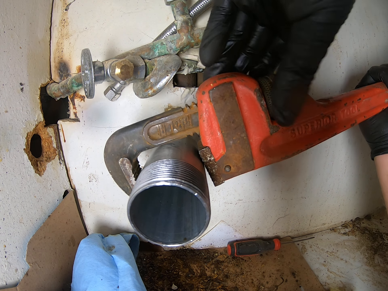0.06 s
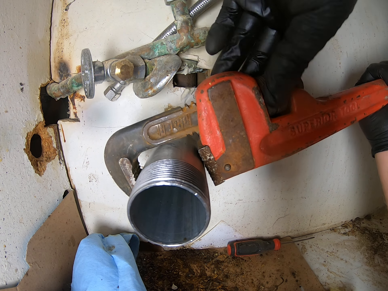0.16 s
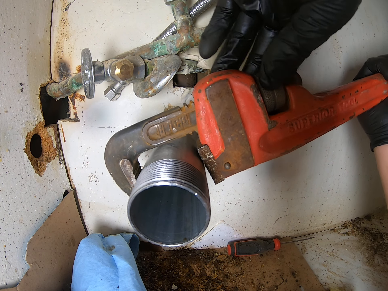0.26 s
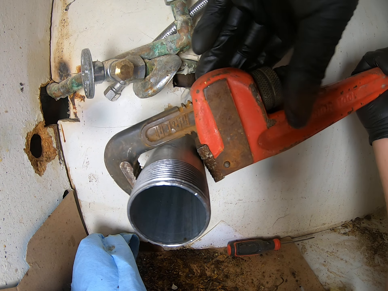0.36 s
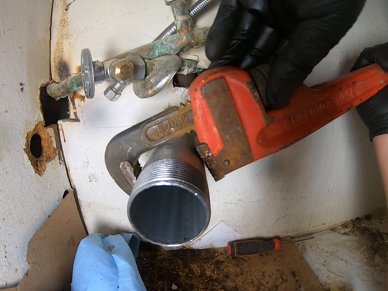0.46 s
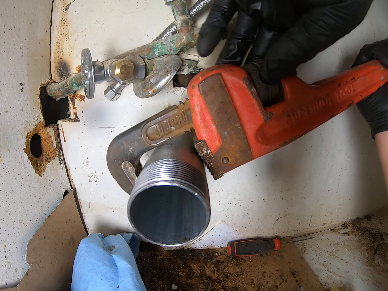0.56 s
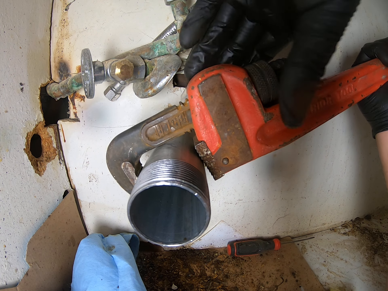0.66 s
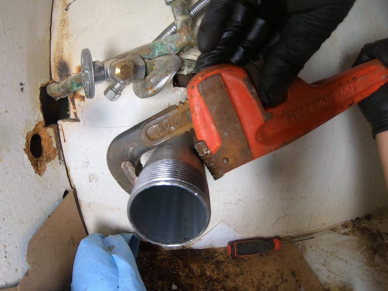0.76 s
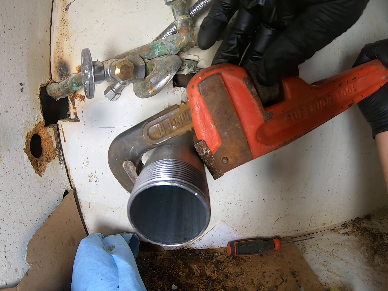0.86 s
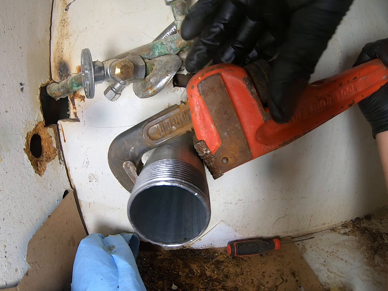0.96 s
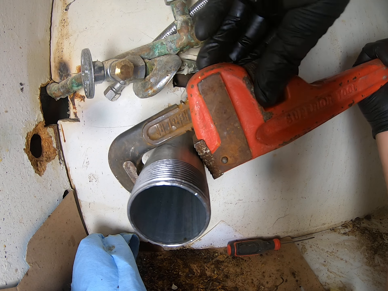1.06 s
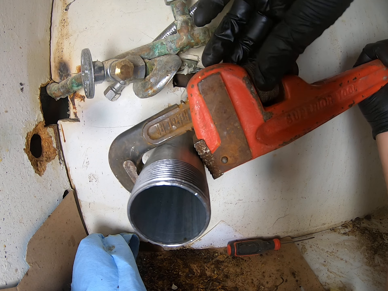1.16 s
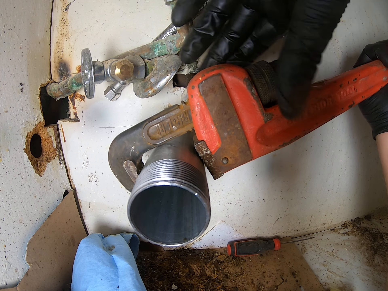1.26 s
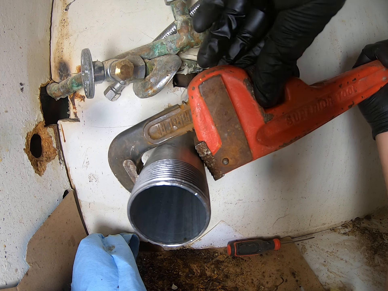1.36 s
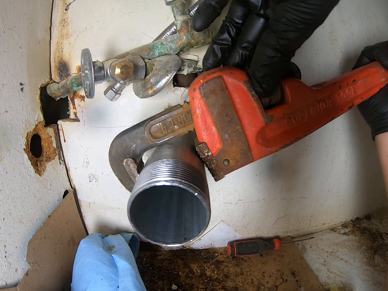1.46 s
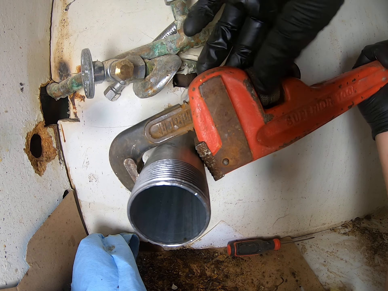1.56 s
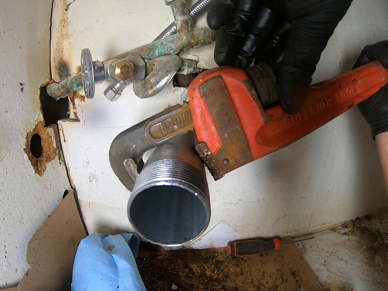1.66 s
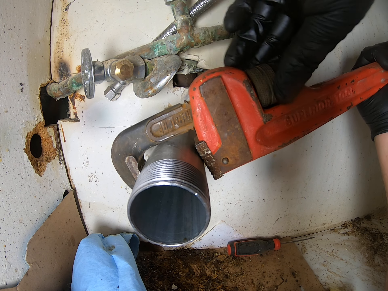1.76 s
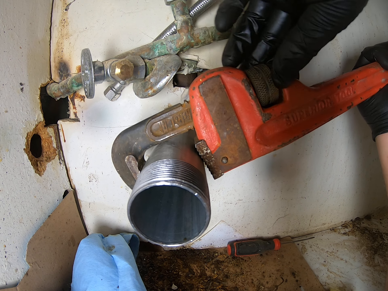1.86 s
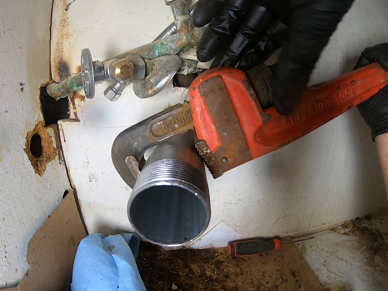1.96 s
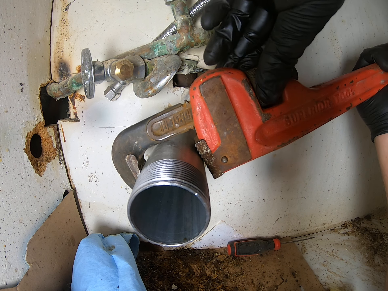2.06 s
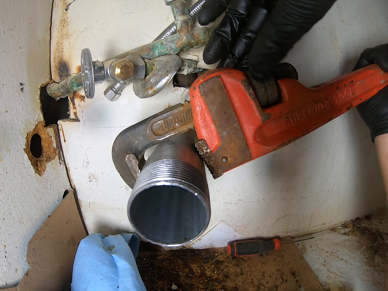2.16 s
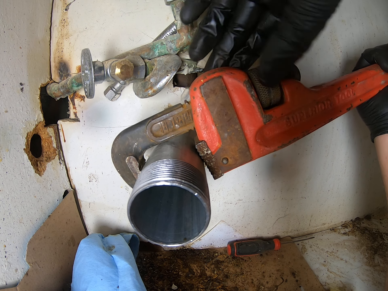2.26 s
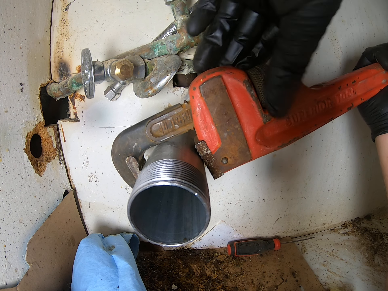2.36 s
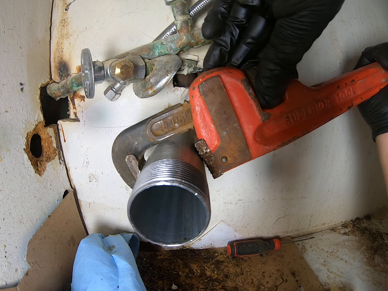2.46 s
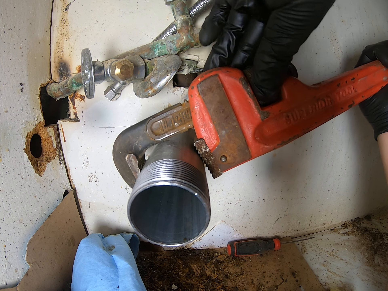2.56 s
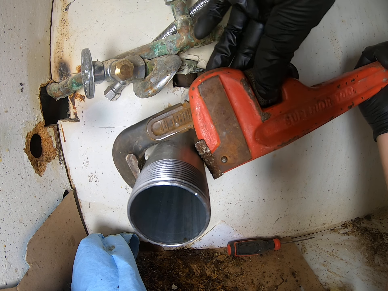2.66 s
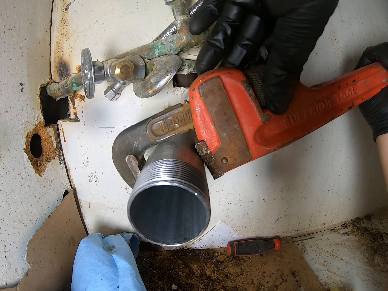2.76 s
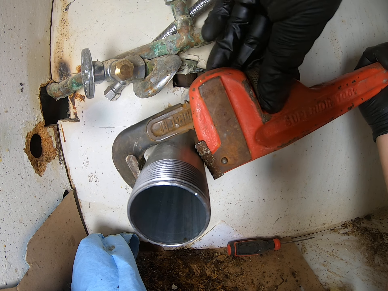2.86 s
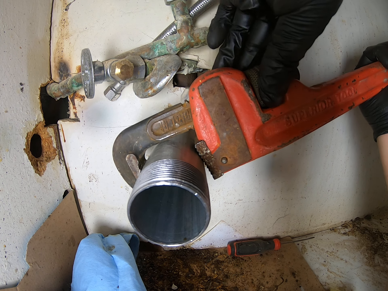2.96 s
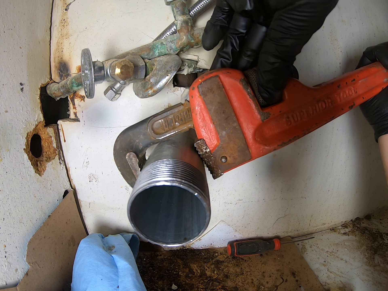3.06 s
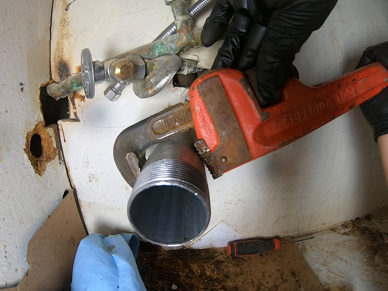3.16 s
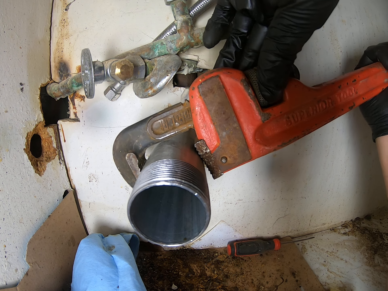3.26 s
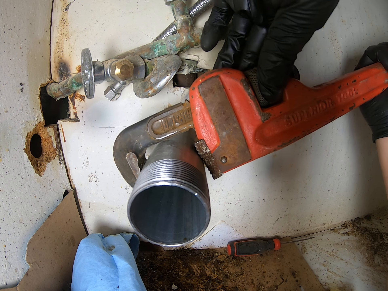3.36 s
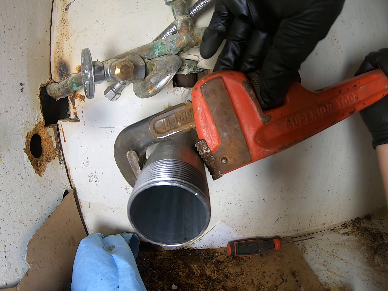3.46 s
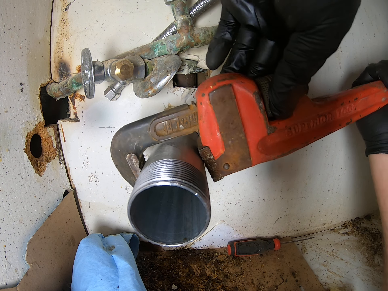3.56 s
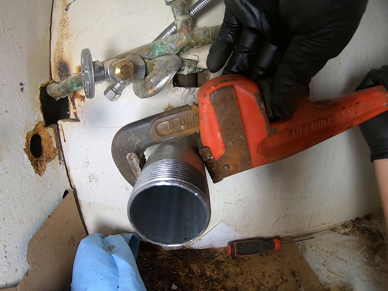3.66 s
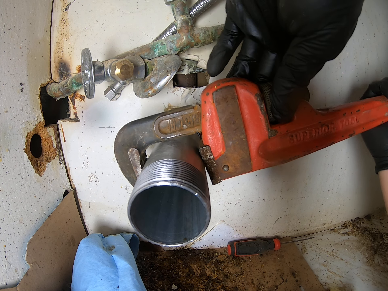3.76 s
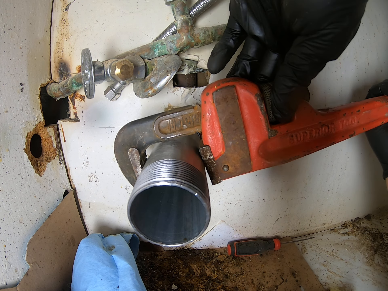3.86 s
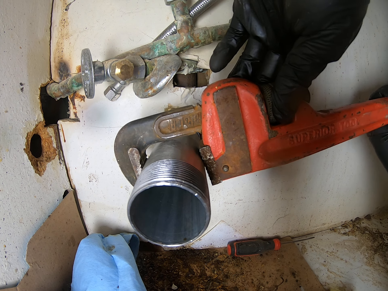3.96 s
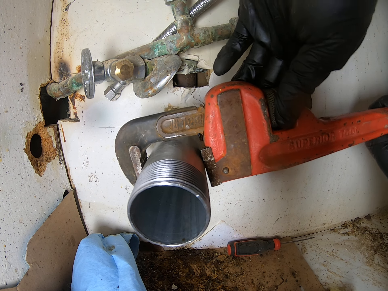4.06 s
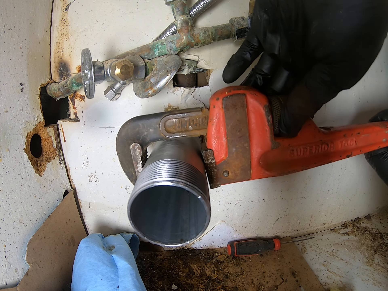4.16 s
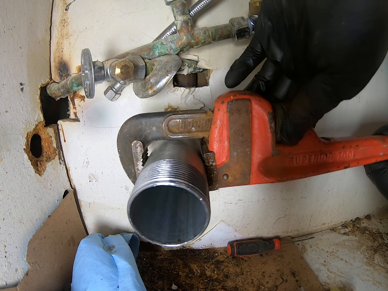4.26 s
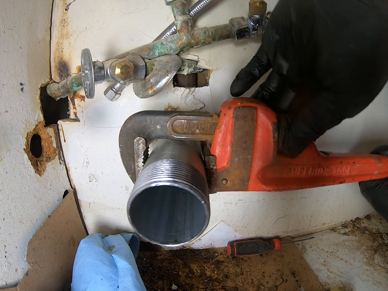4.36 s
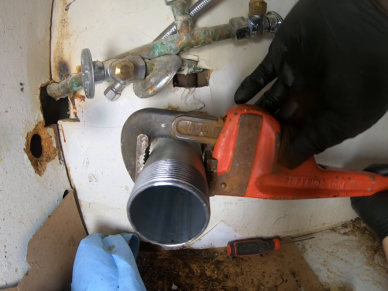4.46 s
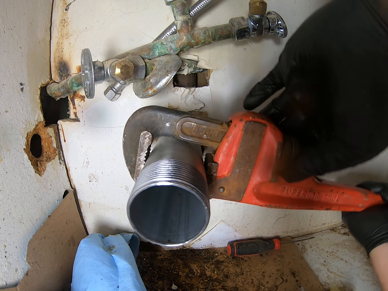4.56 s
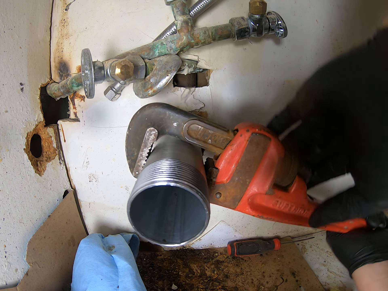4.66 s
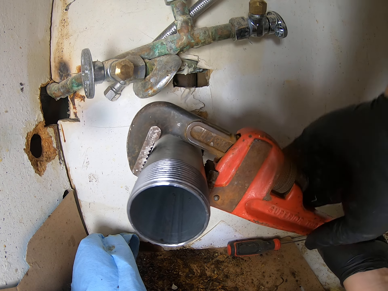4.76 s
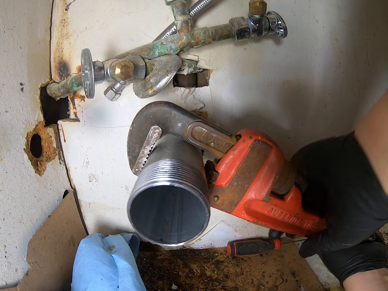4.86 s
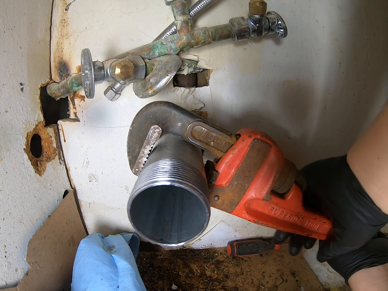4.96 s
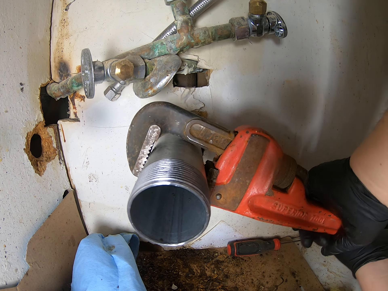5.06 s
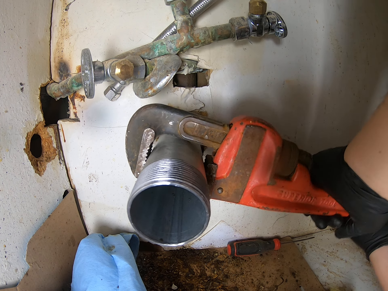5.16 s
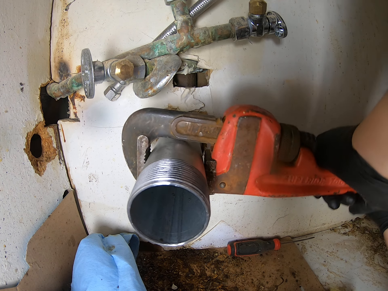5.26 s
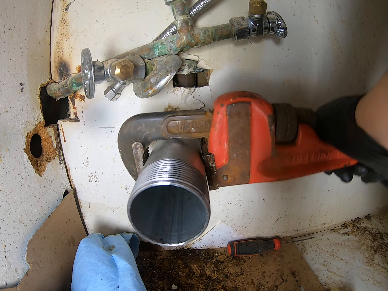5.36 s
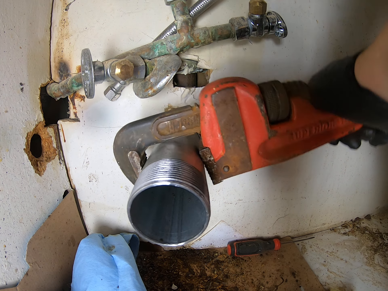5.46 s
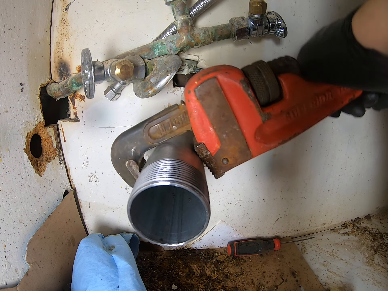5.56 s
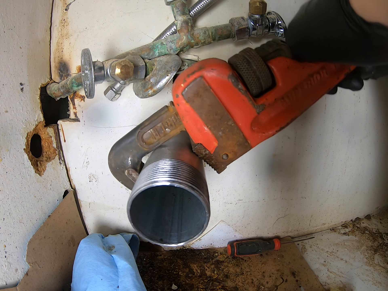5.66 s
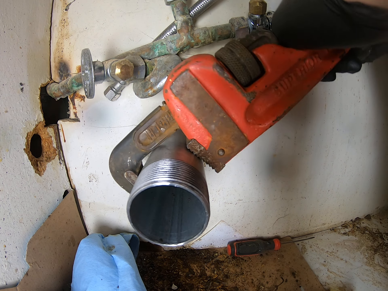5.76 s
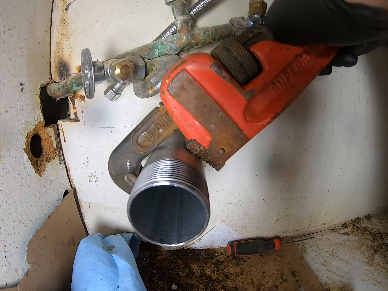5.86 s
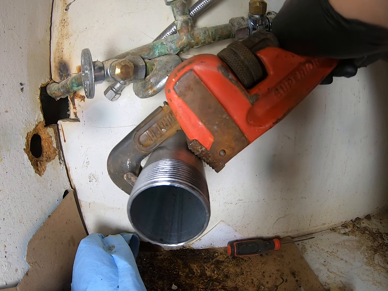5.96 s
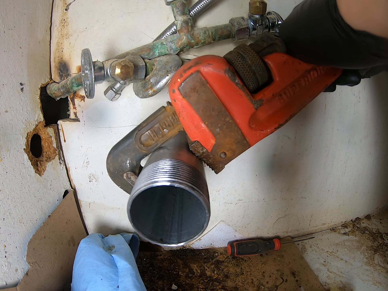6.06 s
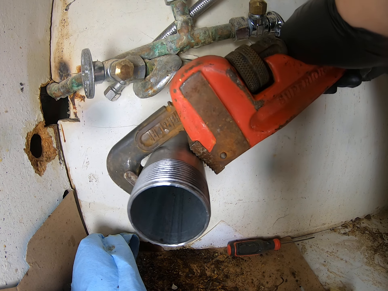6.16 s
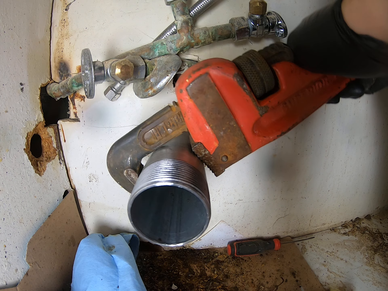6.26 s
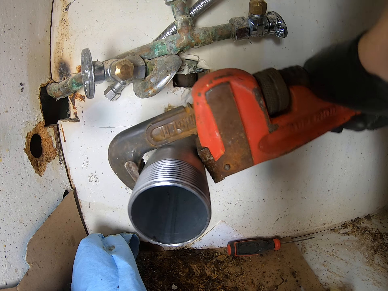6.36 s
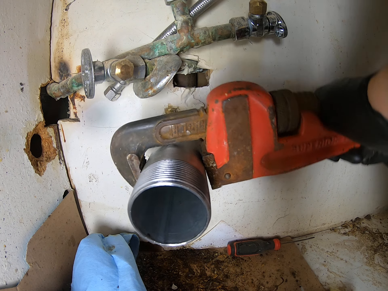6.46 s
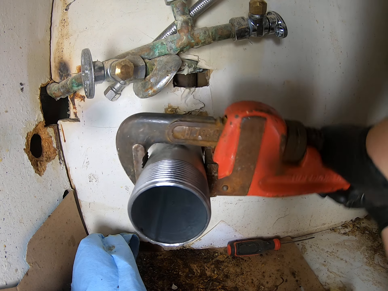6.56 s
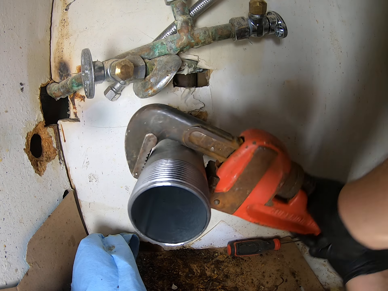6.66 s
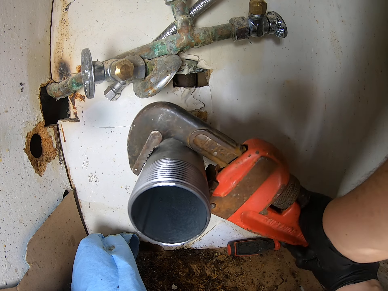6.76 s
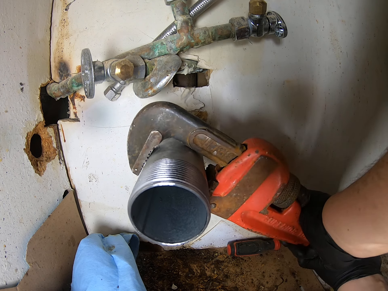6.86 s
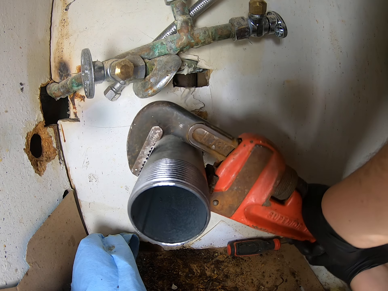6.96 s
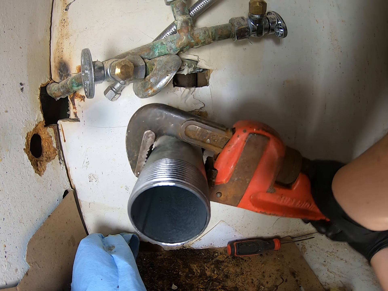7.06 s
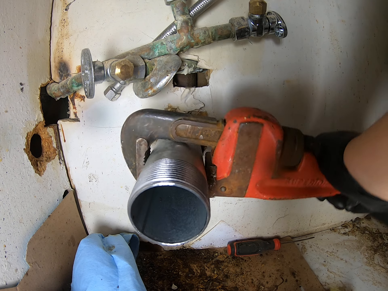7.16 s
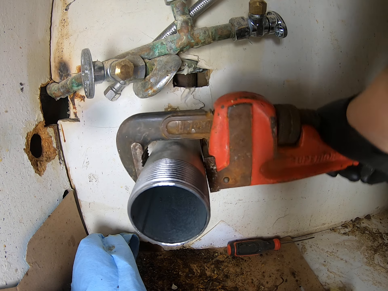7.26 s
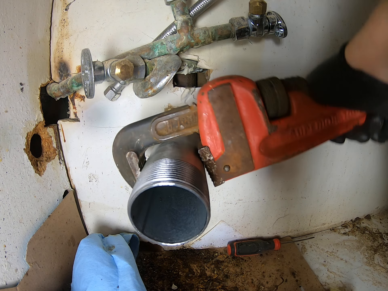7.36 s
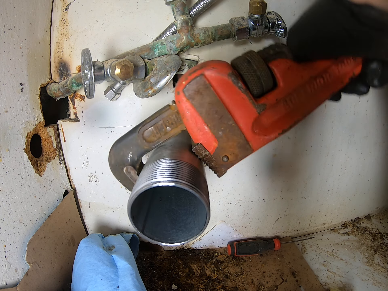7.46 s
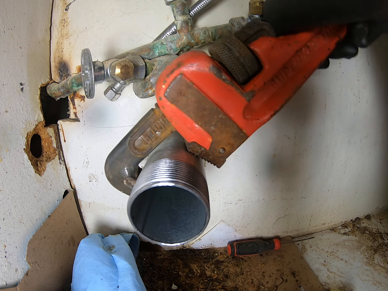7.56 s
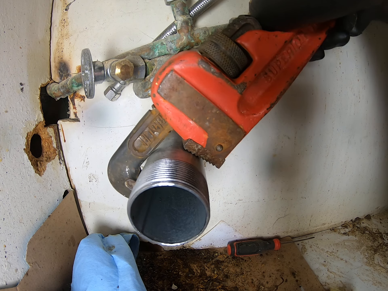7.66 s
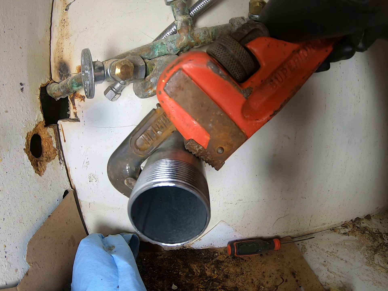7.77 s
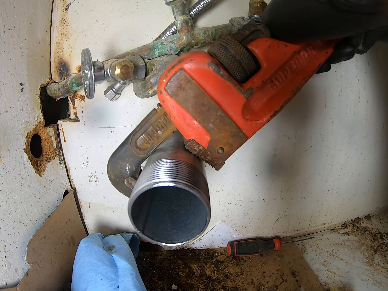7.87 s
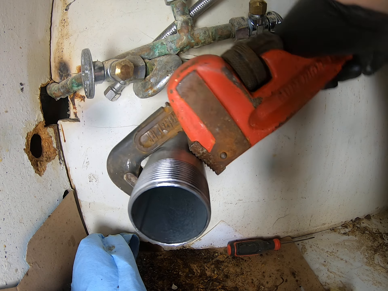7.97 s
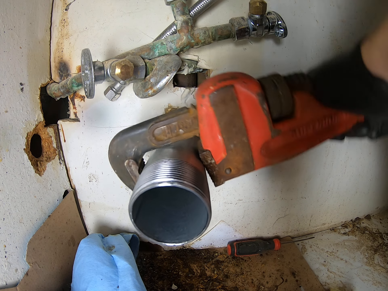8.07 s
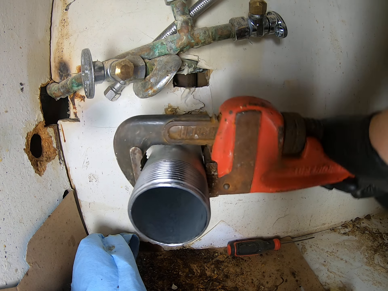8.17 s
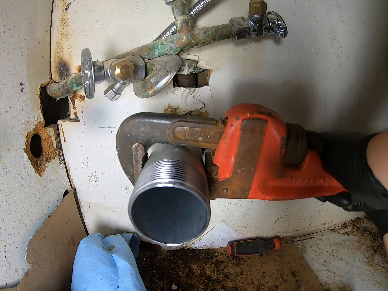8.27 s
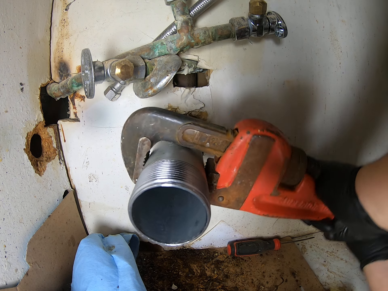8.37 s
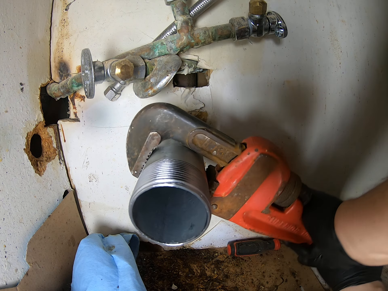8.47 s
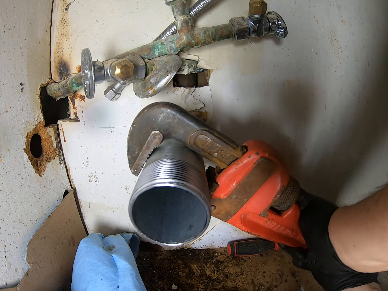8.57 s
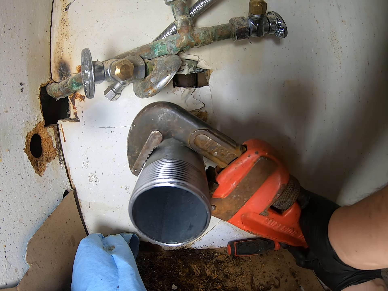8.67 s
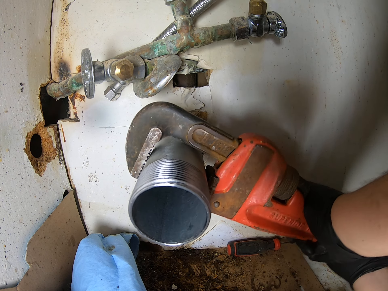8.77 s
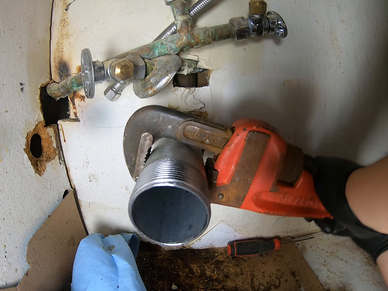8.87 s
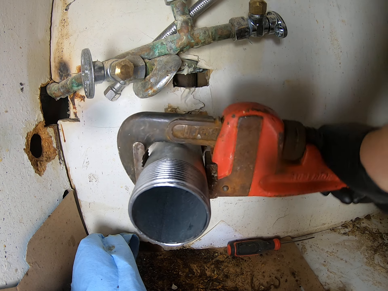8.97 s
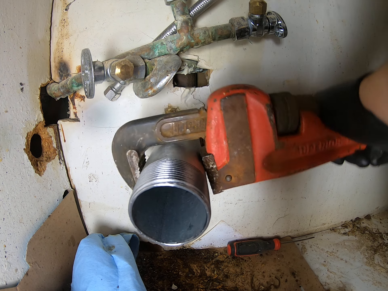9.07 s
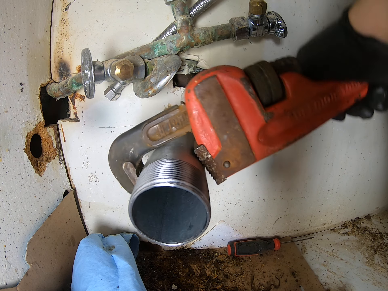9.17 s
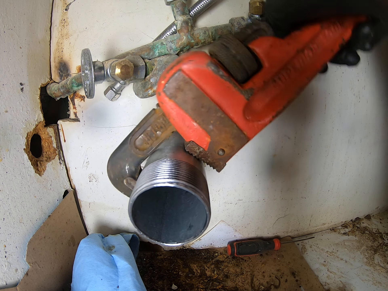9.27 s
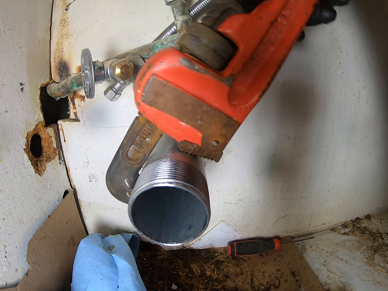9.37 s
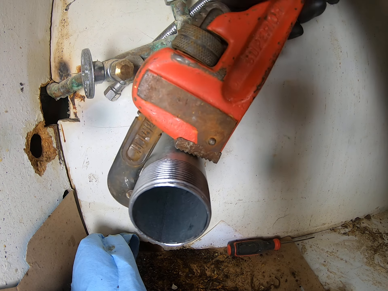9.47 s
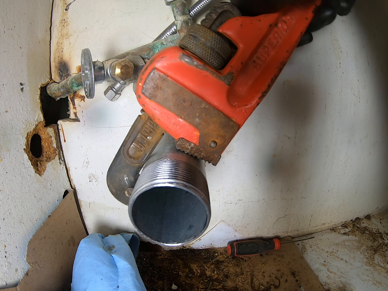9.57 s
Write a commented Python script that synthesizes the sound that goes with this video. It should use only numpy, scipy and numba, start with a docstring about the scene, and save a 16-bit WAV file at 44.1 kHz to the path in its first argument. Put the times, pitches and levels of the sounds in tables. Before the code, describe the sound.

Close microphone in a boxy under-sink cabinet, short tail, faint wavering mains hum throughout. From 0.2 to 1.1 s, quick uneven steel clicks of a wrench jaw and nut, with brief metallic chatter and soft glove rubbing. A sharp snap at 1.5, bright ticks at 1.8-1.9, a strong click at 2.2 and a clack near 3.0. From 3.1 to 5 s it is sparse: small dull taps, soft scuffs, low cabinet murmur. At 5.1 a loud, hard clank with a short ring and jaw rattle. Then grinding strokes and glove hiss, deep thumps at 5.9, a clank at 6.35, knocks and a slam around 7.0, pipe clicks at 7.45 and booms at 7.7. At 8.6-8.8 comes the densest cluster of heavy metal slams and thuds; scattered knocks follow, scraping swells, and pipe clicks end in a final slam at 9.6.

```python
"""Inside a sink cabinet a pipe wrench is set on a steel fitting, its nut thumbed shut, then it is swung round.
Steel clicks are short noisy contacts that crack broadly and excite decaying modes of jaw, nut and pipe.
Sliding teeth and gloves scrape as grainy filtered noise, and a loose jaw chatters and keeps the steel singing.
The cabinet panels boom and hum as shaken and struck resonances, over a mains hum."""
import sys
import numpy as np
from scipy import signal
from scipy.fft import rfft, irfft, next_fast_len
from scipy.io import wavfile
from scipy.ndimage import uniform_filter1d
from numba import njit

SR = 44100
rng = np.random.default_rng(int(sys.argv[2]) if len(sys.argv) > 2 else 0)


def pcm_store(signal):
    """Save signal as 16-bit PCM."""
    levels = np.round(np.clip(np.atleast_2d(signal), -1, 1) * 32767)
    wavfile.write(sys.argv[1], SR, levels.astype(np.int16).T)


N = 424683  # length in samples

# blows of steel on steel: start_s, level_db, spot (name), hardness_db_per_octave (about the jaw's pitch)
BLOWS = [(0.1949, -25.5, "nut", 3), (0.213, -19, "nut", 2), (0.287, -28.5, "jaw", -9),
         (0.3508, -28.5, "jaw", -8), (0.503, -21, "snap", -1.5), (0.559, -28, "jaw", 1),
         (0.5735, -19, "jaw", 8.5), (0.623, -24.5, "nut", -2), (0.6503, -18, "jaw", -1.5),
         (0.678, -33.5, "jaw", 2), (0.73, -45, "tick", 11), (0.849, -37, "tick", 3),
         (0.858, -23.5, "nut", -1), (0.869, -29.5, "jaw", -3), (0.92, -36, "jaw", 11),
         (0.932, -20.5, "nut", -1.5), (0.947, -22.5, "jaw", -5.5), (1.044, -48, "thud", 13),
         (1.016, -49, "tick", 9), (1.114, -42.5, "tick", 5), (1.173, -52.5, "thud", -7),
         (1.284, -48, "thud", -3.5), (1.421, -39, "nut", 5.5), (1.4587, -13.5, "snap", -2),
         (1.489, -28.5, "jaw", 5), (1.518, -25.5, "nut", 0), (1.548, -25, "pipe", -2.5),
         (1.802, -20, "tick", 6), (1.8101, -21, "tick", 0.5), (1.8785, -16.5, "jaw", -7.5),
         (1.889, -13.5, "tick", 3), (2.0066, -25.5, "tick", 0.5), (2.114, -29, "nut", -3.5),
         (2.1625, -13, "jaw", 1), (2.295, -29, "tick", -3), (2.303, -32.5, "tick", 6.5),
         (2.32, -23.5, "nut", -1.5), (2.355, -33.5, "tick", 5.5), (2.448, -48, "nut", -1),
         (2.5011, -32.5, "tick", -2.5), (2.555, -23, "jaw", 1.5), (2.762, -39, "knock", 1.5),
         (2.9602, -17.5, "clack", -4.5), (3.061, -35, "slam", 5.5), (3.563, -35, "tap", 2),
         (3.812, -32.5, "knock", -6), (3.618, -43.5, "tap", 3), (3.707, -42.5, "tap", 0),
         (3.76, -42.5, "tap", 2), (3.962, -43, "tap", -3), (3.993, -46, "tap", 0), (4.408, -41, "tap", 5),
         (4.515, -44.5, "tap", 4), (4.641, -42.5, "tap", -2), (5.11, -4.5, "clank", -1),
         (5.138, -30.5, "thud", 4.5), (5.1962, -20, "clank", -7), (5.55, -35, "thud", 15),
         (5.568, -27.5, "jaw", -4), (5.667, -33, "jaw", 0), (5.7086, -24, "jaw", -2),
         (5.7538, -32.5, "jaw", -11), (5.785, -36, "jaw", -5), (5.872, -35.5, "knock", -7),
         (6.069, -31, "knock", 9), (6.1385, -32, "knock", 5), (6.172, -44, "knock", 7),
         (6.209, -44, "knock", 1), (6.233, -39, "knock", 2), (6.2665, -36, "knock", 4),
         (6.308, -35.5, "knock", 3.5), (6.3524, -17.5, "clank", -8), (6.395, -37.5, "thud", 0),
         (6.437, -33.5, "knock", 4), (6.548, -41, "thud", -3.5), (6.854, -30.5, "knock", 4),
         (6.887, -30, "clack", -4), (6.951, -38.5, "thud", 4), (7.0265, -18, "slam", -9),
         (7.114, -34.5, "pipe", -5.5), (7.141, -28.5, "knock", -1), (7.256, -29.5, "knock", -2.5),
         (7.2945, -27, "knock", 1), (7.191, -42, "knock", 2), (7.357, -40, "pipe", -4),
         (7.449, -18, "pipe", 0), (7.4685, -17, "pipe", 3.5), (7.643, -33, "thud", 1),
         (7.7583, -33, "knock", -5), (7.8024, -30, "nut", 0), (7.88, -35.5, "knock", -1.5),
         (7.921, -45, "tick", 3), (7.954, -33.5, "knock", 3.5), (8.6076, -27.5, "knock", -2.5),
         (8.6127, -17, "slam", 5.5), (8.686, -34, "tick", -13), (8.6944, -8.5, "slam", 0),
         (8.74, -8.5, "slam", 2), (8.762, -14, "slam", 2), (8.793, -24, "clack", -4),
         (8.811, -28, "slam", 0), (8.883, -28, "knock", 1), (8.933, -27, "clack", -7),
         (8.973, -35, "jaw", 3), (9.037, -26.5, "knock", -0.5), (9.058, -38, "knock", -2),
         (9.086, -32, "knock", 4), (9.341, -28.5, "knock", 3.5), (9.428, -40, "nut", 4),
         (9.439, -21, "pipe", 4.5), (9.473, -20.5, "pipe", -3.5), (9.5116, -15.5, "pipe", 0),
         (9.528, -29, "jaw", -13), (9.5548, -35, "nut", 6), (9.5834, -10.5, "slam", -2)]
# nominal wrench and pipe modes in six families (clack, knock, jaw, pipe, nut, tick): pitch_hz, level_db, t60_s
STEEL_MODES = [
    [(2820, 9.5, 0.024), (2994, -6, 0.047), (3590, -4.5, 0.044)],
    [(300, -4, 0.1), (667, 2, 0.089), (971, -1, 0.034), (1114, 0, 0.055), (1480, -10.5, 0.03)],
    [(1873, -17.5, 0.099), (2231, 1, 0.032), (2315, -1, 0.042)],
    [(4240, -8, 0.084), (4480, -3, 0.026)],
    [(4920, -1, 0.035), (4940, -3, 0.039), (5040, -6, 0.033), (5270, -11, 0.04)],
    [(5870, -14.5, 0.04), (6060, 6.5, 0.051), (6820, -16, 0.061), (7620, 1.5, 0.038), (12800, -5, 0.045)],
]
# contact of each family: centre_hz, width_hz, crack_db, ring_db, contact_ms (before stretch), left_minus_right_db
FAMILY_CONTACTS = [(3320, 1100, -13, -19.5, 6.8, 0.5), (1065, 910, 1.5, -6, 12.1, 0),
                   (2320, 670, 3, 0.5, 1.67, 0), (4240, 330, -2, 4, 6.5, 2), (5200, 1500, -1, 1.5, 3.1, 3),
                   (7000, 4800, -5, -7.5, 5.15, 3.5)]
# where steel meets steel sets the mix of families: by spot, clack_db, knock_db, jaw_db, pipe_db, nut_db, tick_db
SPOT_MIX = {"jaw": (0, -20, -3, -20, -22, -38), "nut": (-1, -17.5, -8, -17, -9.5, -24.5),
            "tick": (0.5, -17, -10, -20, -13.5, -9.5), "knock": (-13, -3.5, -13, -23, -30.5, -30.5),
            "clack": (2.5, -27, -15.5, -23.5, -16.5, -19.5), "pipe": (-1.5, -5, -1.5, -11.5, -24.5, -57),
            "clank": (2, -29.5, -22, -17, -21, -53), "snap": (-2, -26, -6, -24, -7.5, -24),
            "thud": (-5, -1.5, -15, -32, -35, -33), "tap": (-24, -5.5, -15, -35, -40, -40),
            "slam": (2, -24, -11, -20, -13, -9)}
# how each spot takes a blow: bite_ms (teeth biting in), pipe_run_db, ring_db, contact_stretch (factor)
SPOT_CONTACTS = {"jaw": (1.5, -11, 0, 1.0), "nut": (2.5, -10, 1.5, 1.5), "tick": (2, -15.5, -0.5, 1.0),
                 "knock": (2.1, 14.7, 2.8, 1.12), "clack": (0.5, -22, -1, 1.5),
                 "pipe": (1.1, -2, -1.7, 0.98), "clank": (2.3, -13, -1, 0.7), "snap": (0.5, -16.5, 1, 1.5),
                 "thud": (1.1, 14.5, 1.1, 0.48), "tap": (1.8, 22.3, 3, 0.81), "slam": (3, -7, -6.5, 1)}
# steel rings freely while the jaw hangs loose and is damped when it bites: time_s, ring_db
JAW_LOOSENESS = [(0, -2), (3.1, 0), (3.6, -15.5), (5.0, 0), (5.45, -6.5), (6.4, -6), (7.0, -4),
                 (8.8, -15.5), (9.4, -3.5), (9.63, -1.5)]
# no two blows land alike: level of each mode (dB), spread of its pitch (share) and of its ring time (log)
MODE_SCATTER_DB, MODE_DRIFT, RING_SCATTER = 3.5, 0.015, 0.18

# single clear tones, short or long, that sound with some of the blows: start_s, near_hz, level_db, t60_s
PINGS = [(0.508, 6060, -40, 0.14), (0.505, 4905, -24, 0.033), (0.575, 4905, -27, .06),
         (1.461, 5090, -22, .035), (1.804, 6060, -31, .2), (1.809, 4972, -13, 0.033),
         (2.962, 6060, -30.5, 0.072), (3.062, 5290, -35, 0.047), (3.062, 4210, -37.5, 0.062),
         (5.111, 4905, -14, 0.037), (5.111, 3105, -5.5, 0.011), (5.114, 4210, -22, .04),
         (5.113, 6750, -37, 0.06), (5.13, 4210, -47.5, .7), (6.355, 5046, -48.5, 0.39),
         (6.354, 4450, -50, .3), (7.03, 3620, -37, .04), (7.033, 4210, -48, .09), (1.552, 4210, -44, .09),
         (8.74, 2840, -18.5, 0.028), (8.766, 3620, -19.5, 0.035), (9.556, 6060, -29, 0.076)]

# spectrum of the teeth's grind: pitch_hz, relative_density_db
GRIND_COLOUR = [(240, -29.5), (450, -11), (904, 3), (1010, -11), (1210, 1.5), (1540, -1.5), (2000, 0),
                (6000, -20), (7800, -42.5), (13200, -120)]
# spectrum of the gloves' hiss: pitch_hz, relative_density_db
HISS_COLOUR = [(1470, -35), (2500, -7.5), (2840, -4.5), (4590, -7), (7580, -10), (9780, -13),
               (11400, -10.5), (15000, -24.5)]
# slides of thumb, glove and teeth: strongest_s, swell_s, fade_s, grind_db, hiss_db
SLIDES = [(.02, 0.2, 0.047, -42, -45.5), (.4, 0.32, 0.64, -47, -49), (.8, 0.23, 0.26, -82, -57.5),
          (1.15, 0.049, 0.24, -73, -59), (1.52, 0.17, 0.38, -56.5, -53.5), (1.95, 0.14, 0.13, -52, -54),
          (2.3, 0.17, 0.16, -58.5, -57), (2.55, 0.11, 0.22, -57, -60), (2.8, 0.051, 0.19, -59.5, -54),
          (3.02, 0.064, 0.21, -57.5, -66), (3.6, 0.029, 0.087, -59.5, -53), (3.95, 0.29, 0.75, -57, -55.5),
          (4.35, 0.087, 0.27, -56, -53.5), (4.85, 0.28, 0.11, -54.5, -49), (5.08, 0.15, 0.084, -56, -43),
          (5.17, 0.11, 0.16, -49, -55.5), (5.72, 0.31, 0.26, -45, -49), (6.15, 0.15, 0.12, -53.5, -62.5),
          (6.7, 0.27, 0.17, -46.5, -46.5), (7.15, 0.26, 0.53, -56.5, -62.5), (7.5, 0.12, 0.27, -43.5, -50),
          (7.9, 0.039, 0.21, -50, -68), (8.24, 0.11, 0.091, -44.5, -45.5), (8.48, 0.13, 0.22, -48.5, -49),
          (8.72, 0.18, 0.22, -53, -59), (9.05, 0.36, 0.14, -50.5, -67), (9.45, 0.38, 0.2, -45, -50)]
STILL_GRIND_DB, STILL_HISS_DB = -75.5, -77  # hands still
# soft gritty scuffs of steel on steel: centre_s, spread_s, level_db, centre_hz
SCUFFS = [(2.298, 0.03, -44.5, 6100), (4.022, 0.028, -42, 3020), (5.222, 0.068, -48, 560),
          (5.745, 0.039, -37.5, 2080), (7.11, 0.03, -44, 1470), (8.777, 0.016, -41.5, 3430),
          (9.083, 0.0095, -48, 1210)]

# resonances of the lowest panel: pitch_hz, width_hz, relative_level_db
LOW_PANEL = [(41.2, 15.6, -12.5), (59.8, 5.55, -7), (66.2, 9.6, -6.5)]
# resonances of the upper panels: pitch_hz, width_hz, relative_level_db
UPPER_PANELS = [(106.6, 27.4, 4.5), (146, 83, -11.5), (204.4, 16, -22), (258.3, 38, -17)]
# pulls and pushes on the handle that shake the cabinet: strongest_s, swell_s, fade_s, low_panel_db, upper_panels_db
HEAVES = [(.2, .4, 0.37, -40, -67), (.45, 0.14, 0.18, -44, -27.5), (1.6, 0.19, 0.098, -33.5, -41),
          (1.95, 0.32, 0.24, -32, -40.5), (2.9, 0.13, 0.34, -44, -45), (3.6, 0.036, 0.59, -36, -40),
          (3.92, 0.083, 0.1, -21.5, -35.5), (4.0, 0.056, 0.12, -45, -33.5), (4.22, 0.14, 0.22, -35, -65),
          (4.95, 0.17, 0.18, -36, -71), (5.22, 0.11, 0.16, -28, -30), (5.36, 0.11, 0.5, -31.5, -39.5),
          (5.92, 0.2, 0.096, -27.5, -30.5), (6.15, 0.1, 0.085, -24.5, -33), (6.85, 0.018, 0.11, -32.5, -51),
          (7.15, 0.098, 0.084, -15.5, -29.5), (7.45, 0.48, 0.94, -30, -27), (7.75, 0.12, 0.14, -17.5, -27),
          (8.68, 0.075, 0.13, -25, -26.5), (9.12, 0.2, 0.18, -24, -29), (9.55, 0.084, 0.093, -18, -15.5)]
REST_LOW_DB, REST_UPPER_DB = -39, -44.5  # cabinet hum with the hands at rest
# jolts that knock the cabinet: start_s, level_db, pitch_hz, t60_s
THUMPS = [(0.47, -16.5, 108.8, 0.27), (3.565, -24.5, 110, 0.15), (5.891, -7, 81.5, 0.14),
          (5.957, -7.5, 104.4, 0.1), (6.866, -17, 98, 0.19), (7.138, -13.5, 71.8, 0.35),
          (7.681, -10.5, 120, 0.2), (7.716, -15, 116.8, 0.48), (8.611, -7, 119, 0.29),
          (8.7, -1, 118, 0.089), (8.747, -5, 113, 0.12), (9.497, -18, 74, 0.13)]

# bursts of loose-jaw chatter: strongest_s, swell_s, fade_s, then level_db of each of the four singing tones
CHATTER = [(.3, .1, 0.14, -49, -56, -68, -56), (5.14, 0.022, 0.065, -54, -64, -62, -58),
           (5.265, 0.045, 0.032, -47.5, -55, -68, -59), (7.07, .03, 0.074, -68, -57, -72, -75),
           (7.13, 0.041, 0.034, -58, -59, -59, -68), (7.34, 0.03, .04, -54, -66, -57.5, -70),
           (9.5, 0.076, .07, -52, -50, -64, -66)]
# jaw, pipe, upper pipe and nut tones: pitch_hz, t60_s
SINGING_TONES = [(2230, .11), (4230, 0.081), (4520, .15), (4950, .08)]
QUIET_JAW_DB = -105
POINTED = 1.87  # exponent of every gesture: 1 = peaks sharply, larger = holds

MAINS_HZ, MAINS_DB, MAINS_WAVER_DB = 59.2, -41, 2.5  # mean pitch, mean level, spread of level
BOX_T60_S, BOX_DB = 0.15, -10  # tail of the cabinet walls
BALANCE_DB = -0.73  # added to the left and taken from the right
# microphone response: pitch_hz, gain_db
MIC_RESPONSE = [(20, -6), (40, -2), (10000, 0), (11500, -16.5), (14500, -8), (16000, -27)]
TOP_HZ = 15670  # edge of the final low-pass


def undb(db):
    """A level in decibels is twenty times the logarithm of the amplitude ratio returned."""
    return 10 ** (np.asarray(db) / 20)


def unit(x):
    """Normalise the mean power, so that the rms is 1."""
    return x / np.sqrt(np.mean(x ** 2))


def curve(table):
    """Linear interpolation of the columns of a time table, one value a sample."""
    s, *columns = np.transpose(table)
    return [np.interp(np.arange(N) / SR, s, c) for c in columns]


def band(x, hz, width_hz):
    """A second-order resonance selects a band about its centre, where the gain is 1."""
    return signal.lfilter(*signal.iirpeak(hz, hz / width_hz, fs=SR), x)


def ring(x, hz, t60):
    """A damped oscillator decays exponentially; a unit impulse starts it at amplitude 1."""
    r = np.exp(-np.log(1000) / (t60 * SR))
    w = 2 * np.pi * hz / SR
    return signal.lfilter([0, r * np.sin(w)], [1, -2 * r * np.cos(w), r * r], x)


@njit
def ring_each(x, which, pole):
    """A damped oscillator on each of two channels keeps its motion while its pole changes from blow to blow."""
    y = np.empty_like(x)
    for c in range(2):
        z = 0j
        for i in range(x.shape[1]):
            z = z * pole[which[i]] + x[c, i] + 1e-18
            y[c, i] = z.imag
    return y


def noise(alike):
    """Sum and difference of independent noises give left and right the stated correlation."""
    c = np.clip(alike, 0, 1)
    mid, side = rng.standard_normal((2, N))
    return np.sqrt((1 + c) / 2) * mid + np.sqrt((1 - c) / 2) * side * np.array([[1], [-1]])


def colour(x, points):
    """Spectral weighting by (Hz, dB) points joined along a logarithmic frequency axis; rms 1."""
    hz, db = np.transpose(points)
    size = next_fast_len(N)
    f = np.arange(size // 2 + 1) * SR / size + 1
    gain = undb(np.interp(np.log(f), np.log(hz), db))
    return unit(irfft(rfft(x, size) * gain, size)[..., :N])


def walk(rate):
    """Smoothed random steps: levels held for 1 / rate seconds and averaged twice; rms 1."""
    k = int(SR / rate)
    held = np.repeat(rng.standard_normal(N // k + 1), k)
    return unit(uniform_filter1d(uniform_filter1d(held, k), k)[:N])


def grit(rate, spread_db, grain_s):
    """Stick-slip friction: random slips of uneven size, each a decaying burst, over an even rub; rms 1."""
    size = undb(spread_db * np.minimum(rng.exponential(size=N), 3.5))
    slips = (rng.random(N) < rate / SR) * size
    return unit(signal.lfilter([1], [1, -np.exp(-1 / (grain_s * SR))], slips + rate / SR))


def gestures(table, rest_db):
    """Powers of gestures add to a rest power; each is 10 dB below its peak one swell before and one fade after."""
    t = np.arange(0, N / SR, 0.002)
    power = undb(rest_db)[:, None] ** 2
    for s, swell, fade, *db in table:
        away = np.where(t < s, (s - t) / swell, (t - s) / fade)
        power = power + undb(np.array(db)[:, None] - 10 * away ** POINTED) ** 2
    return curve(np.column_stack([t, *(10 * np.log10(power))]))


def steadied(x, span_s, share):
    """Dividing by a power of the running amplitude flattens part of the slow swells of a random ring; rms 1."""
    return unit(x / uniform_filter1d(np.abs(x[0]), int(span_s * SR)) ** share)


def mains_hum():
    """A sinusoid of slowly wandering frequency and amplitude is heard as a narrow, wavering hum."""
    hz = MAINS_HZ * (1 + 0.01202 * walk(3.97))
    hum = np.sin(2 * np.pi * np.cumsum(hz) / SR)
    return np.sqrt(2) * undb(MAINS_DB + MAINS_WAVER_DB * walk(2.986)) * hum


def cabinet():
    """Forced and free vibration: panels resonate when shaken by the hands and decay after jolts."""
    low_db, upper_db = gestures(HEAVES, [REST_LOW_DB, REST_UPPER_DB])
    low = sum(undb(db) * unit(band(band(noise(alike=1.0), hz, w), hz, 3 * w)) for hz, w, db in LOW_PANEL)
    upper = sum(undb(db) * unit(band(band(noise(alike=0.99), hz, w), hz, 2 * w)) for hz, w, db in UPPER_PANELS)
    out = undb(low_db) * steadied(low, 0.02, 0.56) + undb(upper_db) * steadied(upper, 0.072, 1.0)
    t = np.arange(SR // 2) / SR
    for s, db, hz, t60 in THUMPS:
        envelope = (1 - np.exp(-t / 0.0045)) * np.exp(-np.log(1000) * t / t60)
        thump = undb(db) * envelope * np.sin(2 * np.pi * hz * t)
        i = int(s * SR)
        out[:, i:i + len(t)] += thump[:N - i]
    return out


def pipe_run():
    """Transmitted vibration: grinding, shaking and knocks sound two bending modes of the pipe run."""
    shake_db = gestures(HEAVES, [REST_LOW_DB, REST_UPPER_DB])[1]
    grind_db = gestures(SLIDES, [STILL_GRIND_DB, STILL_HISS_DB])[0]
    # a biting jaw (low looseness) passes more of the motion on
    jolts_db = -4 + 0.38 * shake_db + 0.47 * grind_db - 0.56 * curve(JAW_LOOSENESS)[0]
    jolts = grit(rate=36, spread_db=3.0, grain_s=0.006) * undb(jolts_db)
    knocks = np.zeros(N)
    for s, db, spot, _ in BLOWS:
        knocks[int(s * SR)] = undb(db + SPOT_CONTACTS[spot][1])
    knocks = signal.lfilter([1], [1, -np.exp(-1 / (0.0084 * SR))], knocks)
    force = (jolts + knocks) * noise(alike=0.81)
    upper_mode = band(band(force, 330.5, 27), 330, 90)
    lower_mode = band(band(force, 247, 31), 239, 69)
    return undb(6) * (upper_mode + undb(-1.0) * lower_mode)


def scrape():
    """Sliding friction: teeth grind in grains and sound the hollow pipe, and gloves hiss in uneven scuffs."""
    grind_db, hiss_db = gestures(SLIDES, [STILL_GRIND_DB, STILL_HISS_DB])
    rub = grit(rate=280, spread_db=5.5, grain_s=0.014) * noise(alike=0.29)
    hollow = sum(undb(g) * ring(rub, f, t60) for f, g, t60 in STEEL_MODES[1])
    grind = colour(rub, GRIND_COLOUR) + undb(-7.0) * unit(hollow)
    glove = grit(rate=750, spread_db=1.0, grain_s=0.0055) * noise(alike=0.21)
    hiss = colour(glove, HISS_COLOUR) * undb([[0.7], [-0.7]])  # a little louder on the left
    catches = grit(rate=70, spread_db=5.0, grain_s=0.0018) * noise(alike=0.7)  # teeth snag on the thread
    ticks = unit(band(catches, 2100, 1800))
    teeth = undb(grind_db + 3.2 * walk(14)) * (grind + undb(-12.5) * ticks)
    return teeth + undb(hiss_db + 1.8 * walk(22)) * hiss


def blows():
    """Impact excitation: each blow is a short rough contact that cracks broadly and rings each family's modes."""
    loose = undb(curve(JAW_LOOSENESS)[0])
    t = np.arange(SR // 20) / SR
    starts = np.sort([s for s, *_ in BLOWS])
    latest = np.searchsorted(starts, np.arange(N) / SR, side="right") - 1  # the blow under way
    # the offset keeps the expected power of a mode unchanged by the scatter
    shape_of_scatter = (len(BLOWS), len(STEEL_MODES), 6)
    favour = undb(MODE_SCATTER_DB * (rng.standard_normal(shape_of_scatter) - MODE_SCATTER_DB / 9))
    seat = rng.standard_normal((*shape_of_scatter, 2))  # each blow finds the parts seated anew
    jaw_hz = FAMILY_CONTACTS[2][0]
    out = 0
    for k, (modes, contact) in enumerate(zip(STEEL_MODES, FAMILY_CONTACTS)):
        hz, width_hz, crack_db, ring_db, ms, pan_db = contact
        push, strike = np.zeros((2, N + len(t)))
        for s, db, spot, hard in BLOWS:
            bite_ms, _, spot_ring_db, stretch = SPOT_CONTACTS[spot]
            # the teeth bite in, then let go
            shape = (1 - np.exp(-1000 * t / bite_ms)) * np.exp(-1000 * t / (ms * stretch))
            size = undb(db + SPOT_MIX[spot][k] + hard * np.log2(hz / jaw_hz))
            at = slice(int(s * SR), int(s * SR) + len(t))
            push[at] += size * shape
            # the modes take the energy of the whole contact
            strike[at] += undb(spot_ring_db) * size * shape / np.sqrt(np.sum(shape ** 2))
        rough = noise(alike=0.62)
        crack = np.sqrt(SR / width_hz / np.pi) * band(band(push[:N] * rough, hz, width_hz), hz, 2 * width_hz)
        rings = 0
        for m, (f, g, t60) in enumerate(modes):
            mode_hz = f * (1 + MODE_DRIFT * seat[:, k, m, 0])
            mode_t60 = t60 * np.exp(RING_SCATTER * seat[:, k, m, 1])
            pole = np.exp((2j * np.pi * mode_hz - np.log(1000) / mode_t60) / SR)
            force = favour[latest, k, m] * loose * strike[:N] * rough
            rings = rings + undb(g) * ring_each(force, latest, pole)
        pan = undb([[pan_db / 2], [-pan_db / 2]])
        out = out + (undb(crack_db) * crack + undb(ring_db) * rings) * pan
    return out


def chatter():
    """Sustained excitation: fast uneven taps of the loose jaw keep the long-ringing modes singing."""
    taps = grit(rate=400, spread_db=-1.5, grain_s=0.0019) * noise(alike=0.93)
    levels = gestures(CHATTER, [QUIET_JAW_DB] * len(SINGING_TONES))
    return sum(undb(db) * unit(ring(taps, f, t60)) for db, (f, t60) in zip(levels, SINGING_TONES))


def pings():
    """Exponential decay of a sinusoid: each tone swells in about a millisecond at the nearest steel mode's pitch."""
    modes = [m for family in STEEL_MODES for m in family]
    out = np.zeros((2, N + SR // 5))
    t = np.arange(SR // 5) / SR
    for (s, hz, db, t60), phase in zip(PINGS, rng.random((len(PINGS), 2))):
        f = min(modes, key=lambda m: abs(m[0] - hz))[0]
        lag = np.array([[0], [1.5 * (phase[1] - 0.5)]])  # phase of right against left, radians
        envelope = undb(db - 60 * t / t60) * (1 - np.exp(-t / 0.00072))
        i = int(s * SR)
        out[:, i:i + len(t)] += envelope * np.sin(2 * np.pi * (f * t + phase[0]) + lag)
    return out[:, :N]


def scuffs():
    """Friction noise through a resonance: short swells of dense grit, each with its own colour."""
    rub = grit(rate=730, spread_db=3.5, grain_s=0.0032) * noise(alike=0.34)
    t = np.arange(N) / SR
    out = 0
    for s, spread_s, db, hz in SCUFFS:
        swell = np.exp(-0.5 * ((t - s) / spread_s) ** 2)
        out = out + undb(db) * swell * unit(band(band(rub, hz, 0.42 * hz), hz, 3.4 * hz))
    return out


def box_tail(steel):
    """Diffuse reverberation: convolution with exponentially decaying noise stands for the box walls."""
    t = np.arange(int(0.25 * SR)) / SR
    walls = rng.standard_normal((2, len(t))) * np.exp(-np.log(1000) * t / BOX_T60_S) * (t > 0.002)
    walls /= np.sqrt(np.sum(walls ** 2, axis=1, keepdims=True))
    return undb(BOX_DB) * signal.fftconvolve(steel.mean(axis=0, keepdims=True), walls, axes=1)[:, :N]


def scene():
    """Superposition: all sources add, and the blows and pings alone excite the tail of the box."""
    hums = mains_hum() + cabinet() + pipe_run()
    rubbing = scrape() + scuffs()
    steel = blows() + pings()
    mix = hums + rubbing + steel + box_tail(steel) + chatter()
    return mix * undb([[BALANCE_DB], [-BALANCE_DB]])


def record(dry):
    """Linear filtering: the microphone weakens the deepest bass and the top octave, and a low-pass cuts the top."""
    hz, db = np.transpose(MIC_RESPONSE)
    f = np.linspace(1, SR / 2, 1025)
    response = undb(np.interp(np.log(f), np.log(hz), db))
    taps = np.roll(irfft(response), 1024)  # symmetric, so no phase shift once the delay is removed
    x = signal.fftconvolve(dry, taps[None], axes=1)[:, 1024:N + 1024]
    return signal.sosfilt(signal.ellip(8, 0.2, 70, TOP_HZ, fs=SR, output="sos"), x)


dry = scene()
out = record(dry)
pcm_store(out)
```